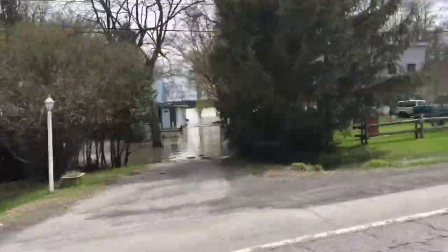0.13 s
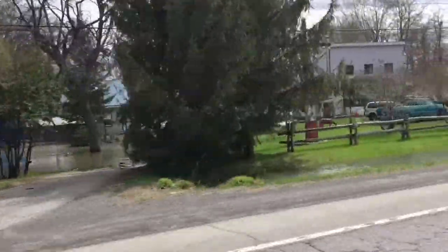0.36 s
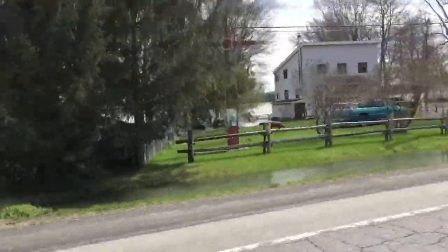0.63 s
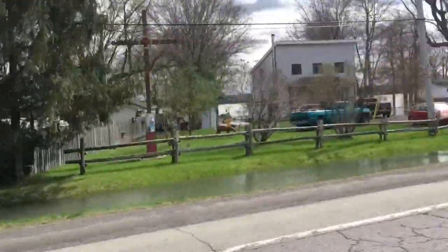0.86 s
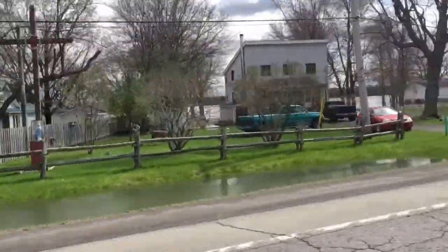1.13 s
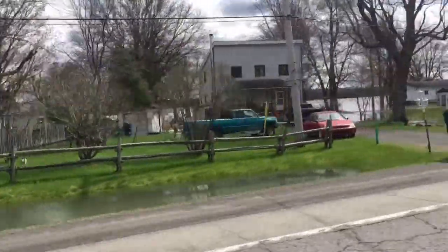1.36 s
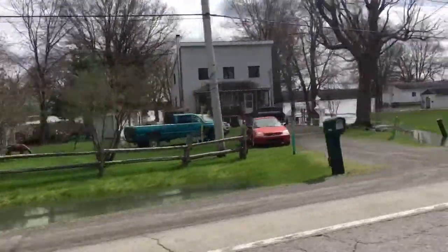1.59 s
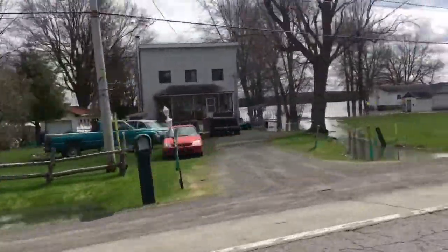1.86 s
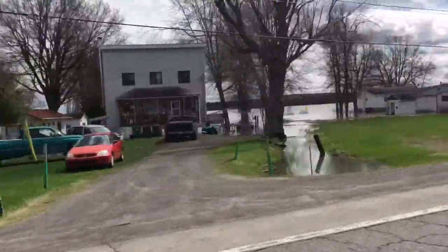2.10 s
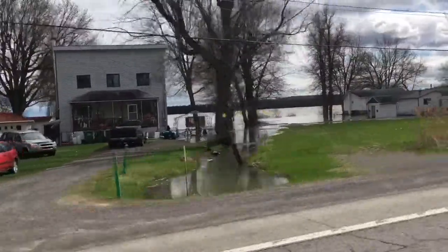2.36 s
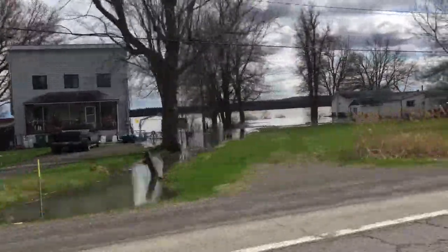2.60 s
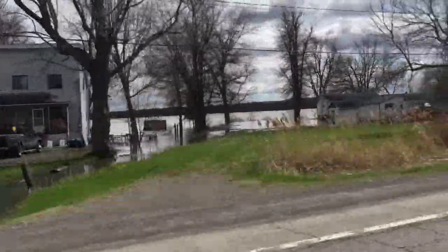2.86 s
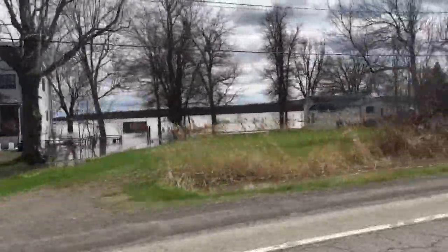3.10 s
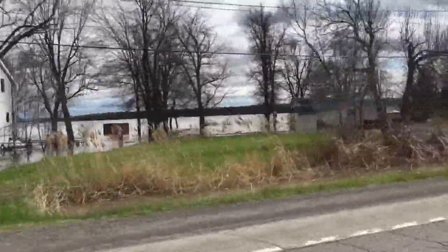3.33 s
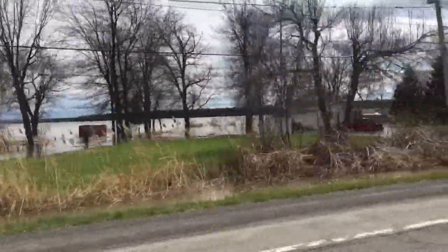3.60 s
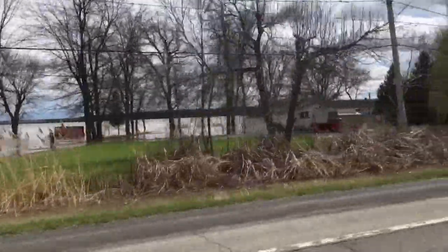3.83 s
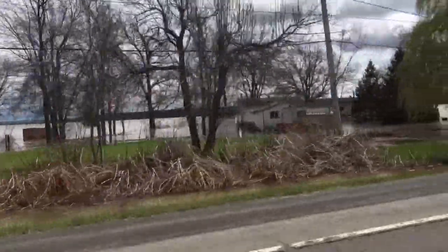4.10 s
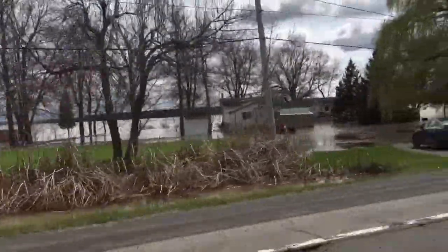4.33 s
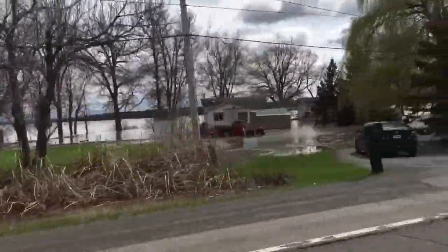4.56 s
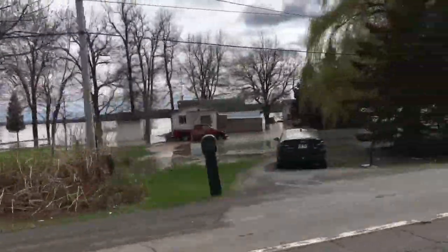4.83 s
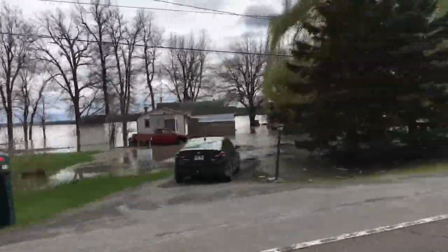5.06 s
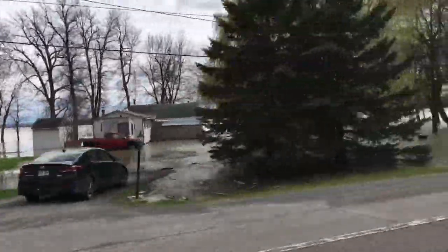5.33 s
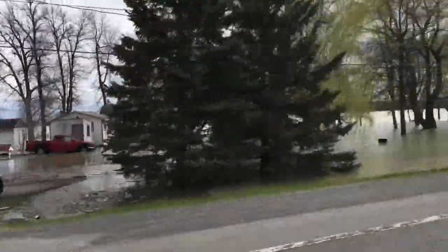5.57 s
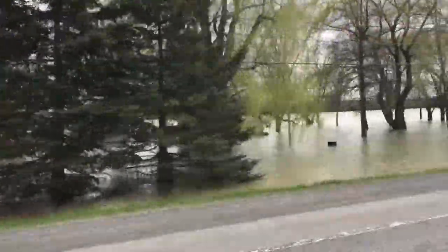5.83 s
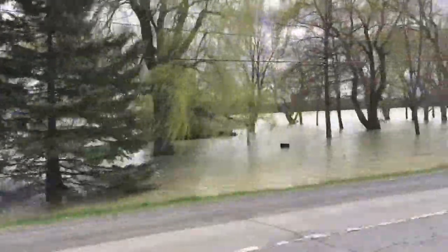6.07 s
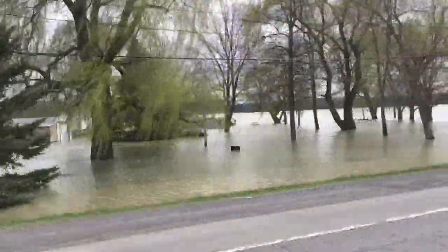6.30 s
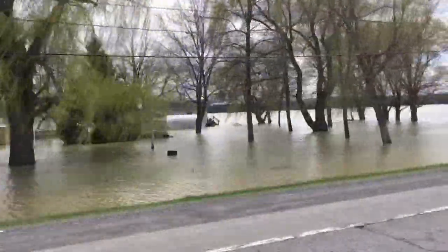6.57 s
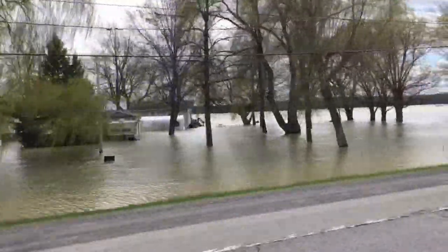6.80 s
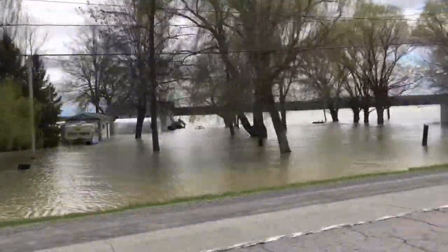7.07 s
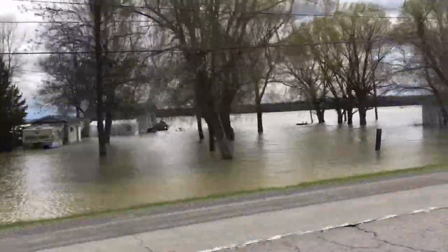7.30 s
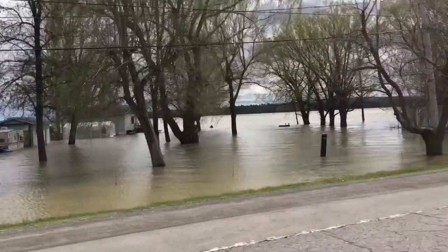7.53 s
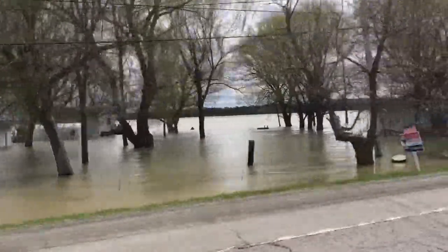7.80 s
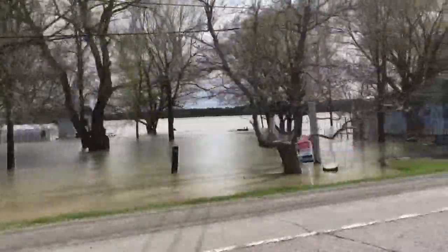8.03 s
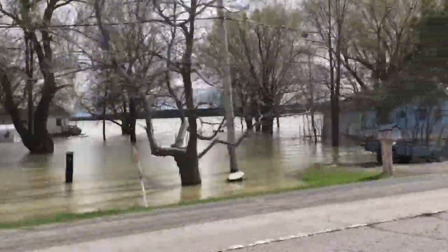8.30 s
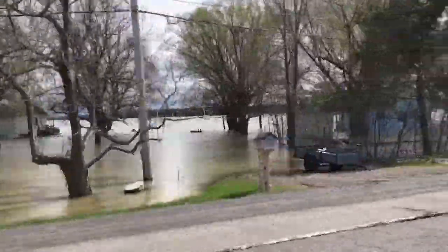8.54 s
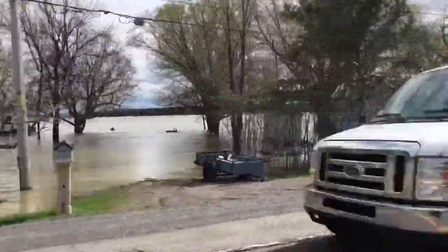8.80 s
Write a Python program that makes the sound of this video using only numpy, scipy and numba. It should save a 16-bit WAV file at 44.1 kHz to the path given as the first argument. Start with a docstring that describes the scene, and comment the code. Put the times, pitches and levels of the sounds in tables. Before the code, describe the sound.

A phone held at a car's open window catches rough wind noise directly on its microphone: dull thumps, tearing flutter and occasional sharp cracks, the loudest squashed by limiting. Underneath run a wobbling low throb, broad tyre roar with a faint tread hum, and thin slipstream hiss. Gusts come in clusters, ease after six seconds, then strike hard again as the road noise rises.

```python
"""In a car on a country road, a phone films from the open window. Tyres roar and slipstream hisses behind (noise
shaped by frequency), the tread hums, and high hiss fizzes faintly. The cabin air throbs low and unevenly: a tone of
wandering pitch with turbulence. Eddies of wind burst on the microphone port: a ragged rip and a slower flutter of
noise, then a thump of swinging air. The hardest add a crack of bright noise, and the loudest bursts are limited."""
import sys
import numpy as np
from scipy import signal
from scipy.fft import rfft, irfft
from scipy.io import wavfile
from scipy.ndimage import uniform_filter1d, minimum_filter1d
from numba import njit

SR = 44100
rng = np.random.default_rng(int(sys.argv[2]) if len(sys.argv) > 2 else 0)


def attenuation_scalar(level_db):
    """Turn a level in dB into a linear amplitude multiplier (20 dB per decade)."""
    decades = np.asarray(level_db, float) / 20
    return 10 ** decades


def log_audio(samples):
    """Write samples as a 16-bit WAV file to the path given in sys.argv[1]."""
    # one column per channel
    frames = np.atleast_2d(samples).T
    # limit to full scale, then quantise
    limited = np.clip(frames, -1, 1)
    pcm = np.round(limited * 32767).astype(np.int16)
    wavfile.write(sys.argv[1], SR, pcm)


N = 392931  # samples in the scene

# The strong eddies on the port; the levels are those before each part's own offset and ceiling.
# Each row: middle in seconds, nominal length in ms, thump level in dB, flutter level in dB, rip level in dB.
EDDIES = [(0.394, 22, -23, -16.5, -17), (0.624, 19, -14, -18.5, -35.5), (0.634, 6.4, -20, -23, -18.5),
          (0.66, 6, -34, -32, -23), (0.762, 7.1, -14, -27, -37), (0.825, 15, -16, -30, -42),
          (0.977, 18, -9, -9.5, -16), (1.198, 6, -6, -16, -24), (1.217, 19.5, -6.5, -17.5, -14.5),
          (1.228, 8, -15, -14, -22), (1.312, 9, -1, -17, -21), (1.344, 12, -17, -32, -30.5),
          (1.38, 8.6, -14.5, -23, -25), (1.426, 10, -13, -17, -16), (1.5, 13.4, 3, -10.5, -10),
          (1.559, 13, -22, -14.5, -27), (1.592, 4.6, -3, -18, -19.5), (1.661, 4.7, -8.5, -38, -20.5),
          (1.764, 8.6, -25, -14.5, -28), (1.787, 29, -15.5, -34, -22.5), (1.832, 11, -13, -9.5, -21.5),
          (1.869, 27, -16, -12.5, -11.5), (2.006, 14, -27, -18, -21.5), (2.054, 17, -19, -12.5, -27),
          (2.091, 10, -12, -8, -12.5), (2.147, 15, -12.5, -26, -27.5), (2.212, 13.5, -27, -16.5, -16),
          (2.234, 11, -9.5, -18, -24.5), (2.375, 37, -12, -17, -26), (2.438, 9.3, -28, -15.5, -26),
          (2.628, 7.4, -39, -18.5, -25), (2.889, 36, -15, -31, -28), (2.98, 17, -15, -33, -23),
          (3.011, 22, -6, -17.5, -24.5), (3.184, 8.6, -28, -21, -27), (3.215, 17, -21, -22, -26),
          (3.262, 11.4, -25, -17, -21), (3.376, 39, -23, -19.5, -29), (3.41, 17, -13, -16, -20),
          (3.463, 10, -22, -15, -20), (3.54, 15, -5, -14, -19.5), (3.597, 8, -13, -16, -20),
          (3.607, 10, -9.5, -14.5, -12), (3.673, 11, -15.5, -24, -29), (3.751, 10, -25, -23, -26),
          (3.83, 13, -29, -23, -27), (3.918, 7.9, -28, -25, -25), (4.015, 38, -8.5, -18, -28),
          (4.044, 8.5, -16, -24, -25), (4.103, 4.4, -32, -27, -30), (4.229, 13, -14, -19.5, -44),
          (4.307, 9.4, -7, -16, -38), (4.331, 14, -16, -25, -24), (4.432, 26, -29, -18.5, -19.5),
          (4.483, 16, -5, -7.5, -21.5), (4.494, 7, -22, -25, -11.5), (4.524, 12, -20, -21, -35),
          (4.56, 12.7, -5.5, -8, -11.5), (4.638, 12.5, -9.5, -11, -17), (4.651, 7.4, -15, -17, -21),
          (4.718, 10.5, -11.5, -22, -22.5), (4.818, 28, -8.5, -16, -18.5), (4.886, 7, -5.5, -5, -12),
          (5.016, 10.7, -26, -12, -21.5), (5.071, 20, -10, -22, -27.5), (5.096, 8, -17, -17, -17),
          (5.106, 10.6, -9.5, -17, -13), (5.167, 11, -11, -18, -19.5), (5.221, 13, -11, -13, -21.5),
          (5.24, 27, -11.5, -15, -17), (5.279, 14.5, -5, -13, -17.5), (5.301, 5.2, -22, -13, -25),
          (5.324, 5.5, -11, -15, -12.5), (5.395, 4.5, -8, -7.5, -16), (5.455, 12, -25, -19, -33),
          (5.525, 8.7, -24, -26, -24), (5.55, 18, -19, -14.5, -17), (5.617, 19.4, -6.5, -16.5, -13),
          (5.59, 14, -30, -21, -26), (5.658, 4.3, -4.5, -18.5, -19.5), (5.724, 12, -17, -23, -35),
          (5.797, 18.6, -5, -6.5, -7.5), (5.82, 4.2, -10, -13, -20), (5.839, 8, -17, -16, -30),
          (5.87, 14, -5.5, -11, -8), (5.894, 22, -9.5, -10, -18), (5.943, 14, -28, -30, -34),
          (5.997, 8.2, -39, -31, -34), (6.038, 42, -30, -19, -22.5), (6.081, 8, -35, -18.5, -15),
          (6.108, 14, -20, -22, -25), (6.151, 10, -20, -27, -17), (6.165, 5.8, -9, -13, -15.5),
          (6.287, 13, -28, -21.5, -37), (6.592, 10, -2, -11, -13.5), (6.676, 22, -17, -17.5, -24),
          (6.701, 7, -32, -23, -30), (6.816, 6.6, -23, -14.5, -27), (6.9, 8.3, -17, -23, -27),
          (7.2, 6.3, -15, -10.5, -33), (7.209, 10, -18, -21, -20.5), (7.234, 10, -24, -24, -26),
          (7.27, 21, -29, -16, -21), (7.486, 7.5, -6.5, -24, -17.5), (7.5, 8.6, -12, -18, -32),
          (7.514, 12, -10, -20, -51), (7.689, 7.8, -27, -17.5, -45), (8.11, 4.7, -16, -13.5, -33),
          (8.179, 16, -13, -23, -45), (8.273, 24, -9, -23.5, -39), (8.306, 10, -11, -11.5, -40),
          (8.601, 15, -23, -19, -20), (8.628, 12, -14.5, -5.5, -9.5), (8.643, 12, -9, -19, -15.5),
          (8.702, 8.3, -34, -22, -20), (8.743, 45, -15, -17, -37), (8.795, 11.4, -8, -6, -6),
          (8.861, 19, -15, -11.5, -16), (8.874, 7.3, -6, -7, -3), (8.888, 13, 2, -6, -20.5)]


def curves(table):
    """Joins the rows of a table by straight lines: one curve over time per column."""
    s, *columns = np.transpose(table)
    return [np.interp(np.arange(N) / SR, s, c) for c in columns]


def walk(rate, size=N):
    """A smooth random wander: draws held for 1 / rate seconds, then averaged twice; spread near 1."""
    hold = max(int(SR / rate), 1)
    steps = np.repeat(rng.standard_normal(size // hold + 1), hold)
    smooth = uniform_filter1d(uniform_filter1d(steps, hold), hold)
    return 1.3 * smooth[:size]


def noise(shape, flicker_db=0, shared_db=0, rate=10):
    """Noise of a given spectrum, rms 1, in octave bands that flicker together and alone."""
    hz = np.maximum(np.arange(N // 2 + 1) * SR / N, 1)
    at, db = np.transpose(shape)
    shape_db = np.interp(np.log(hz), np.log(at), db, left=-120, right=-120)
    full = rfft(rng.standard_normal(N)) * attenuation_scalar(shape_db)
    out, shared = 0, shared_db * walk(rate)
    for octave in np.arange(np.floor(np.log2(at[0])), np.log2(at[-1]) + 1):
        share = np.clip(1 - abs(np.log2(hz) - octave), 0, 1)  # neighbouring bands overlap
        out = out + irfft(full * share, N) * attenuation_scalar(shared + flicker_db * walk(rate))
    return out / np.std(out)


def even(x, ms):
    """Flattens the chance swells of noise, so that a short burst has the strength it is given."""
    return x / np.sqrt(uniform_filter1d(x ** 2, int(ms * SR / 1000)) + 1e-9)


def swing(hz, wander, rate):
    """Air swinging to and fro at a pitch that wanders; rms 1."""
    pitch_hz = hz * np.exp(wander * walk(rate))
    return np.sqrt(2) * np.sin(2 * np.pi * np.cumsum(pitch_hz) / SR)


def puffs(s, db, width_ms, lean=0.17):
    """Bell-shaped envelopes that rise faster than they fall and add in power."""
    power = np.zeros(N)
    for at, gain, width in np.broadcast(s, attenuation_scalar(db), np.asarray(width_ms) * SR / 1000):
        i = np.arange(max(int(at * SR - 4 * width), 0), min(int(at * SR + 4 * width), N))
        age = (i - at * SR) / width + lean
        power[i] += gain ** 2 * np.exp(-(age / (1 + lean * np.sign(age))) ** 2)
    return np.sqrt(power)


def road():
    """Tyre roar up to the low treble, a narrow tread hum and a thin slipstream hiss, all made of noise."""
    # How loud the road is heard; it sinks while hard eddies burst.
    # Each row: time in seconds, tyre roar in dB, slipstream hiss in dB.
    road_levels = [(0.0, -32.5, -55.5), (0.3, -30.5, -55), (0.5, -29, -53), (0.8, -27.5, -50.5),
                   (1.15, -28.5, -52), (1.5, -30, -54), (1.85, -32, -54.5), (2.3, -30.5, -54),
                   (2.8, -27.5, -50.5), (3.3, -28, -51.5), (3.6, -29.5, -54), (3.97, -29.5, -51),
                   (4.4, -30, -55), (4.9, -33, -56), (5.4, -33, -57.5), (5.75, -34.5, -58),
                   (5.98, -39, -57), (6.2, -35.5, -57.5), (6.5, -33, -56.5), (6.8, -30, -52.5),
                   (7.1, -30, -52), (7.55, -31, -52), (7.9, -28.5, -52.5), (8.3, -27, -49.5),
                   (8.65, -24.5, -47.5), (8.91, -24, -45)]
    # The tone of the roar, the hiss and the hum. Each row: frequency in Hz, relative level in dB per Hz.
    tyre_tone = [(90, -31), (150, -6.5), (314, -9), (445, -12.5), (526, -5.5), (745, -11.5), (958, -8.5),
                 (1450, -9.5), (2150, -14), (2450, -20.5), (2700, -28.5), (3000, -31), (3300, -38),
                 (4200, -42.5)]
    slipstream_tone = [(1940, -23.5), (3300, -4), (3840, -6.5), (4520, 0.5), (4890, -3), (5390, 1.5),
                       (6480, 1), (7740, -6.5), (9540, -7), (10500, -13), (14900, -10.5), (15800, -22)]
    hum_tone = [(380, -15), (460, -4.5), (530, 1), (620, -18)]
    # The hum comes forward at the end. Each row: time in seconds, level in dB.
    hum_levels = [(0, -41.5), (1, -47), (5, -48.5), (7.5, -43.5), (8.2, -39), (8.91, -31)]
    tyre_db, hiss_db = curves(road_levels)
    tyres = attenuation_scalar(tyre_db) * noise(tyre_tone, 0.7, 0.7, 22)
    hum = attenuation_scalar(curves(hum_levels)[0]) * noise(hum_tone, 1.3)
    hiss = attenuation_scalar(hiss_db) * noise(slipstream_tone, 0.8, 0.78, 18)
    return tyres + hum + hiss


def fizz(weak_rate=3, weak_db=-66):
    """Faint puffs of high hiss at set times; others come by chance, weak_rate of them a second."""
    # The treble fizzes briefly. Each row: time in seconds, level in dB, centre in Hz.
    fizz_puffs = [(1.235, -56.5, 11900), (3.208, -58, 11000), (3.952, -57, 12000), (5.48, -59.5, 10000),
                  (8.272, -49, 8500)]
    chance = rng.random((int(weak_rate * N / SR), 2)).T
    weak_tone = noise([(8000, -22), (12000, 0), (15800, -13)])
    total = puffs(chance[0] * N / SR, weak_db + 6 * chance[1], 6.4) * weak_tone
    for s, db, hz in fizz_puffs:
        tone = noise([(0.59 * hz, -20), (hz, 0), (min(1.1 * hz, 16000), -9)])
        total = total + puffs(s, db, 7.8) * tone
    return total


def throb():
    """The cabin air swings at a quickly wandering pitch, in surges and lulls; broad turbulence rides on it."""
    # The surges and lulls. Each row: time in seconds, level in dB before wander and breaks.
    throb_levels = [(0.0, -17.5), (0.1, -13.5), (0.3, -18.5), (0.55, -14), (0.6, -16.5), (0.65, -5.5),
                    (0.79, -20.5), (0.97, -8.5), (1.09, -28), (1.14, -9.5), (1.49, -20), (1.51, -13),
                    (2.01, -19), (2.11, -13), (2.21, -20.5), (2.95, -12), (3.23, -18.5), (3.45, -3.5),
                    (3.5, -18), (3.6, -8), (3.65, -21.5), (3.72, -11), (3.9, -19), (4.02, -10.5),
                    (4.27, -20.5), (4.32, -8), (4.37, -20), (4.44, -8), (4.69, -16.5), (4.91, -15),
                    (4.96, -26), (5.09, -12.5), (5.21, -20), (5.24, -13), (5.46, -25.5), (5.53, -14),
                    (5.61, -16), (5.83, -16), (6.03, -23.5), (6.18, -14.5), (6.2, -27.5), (6.4, -24),
                    (6.43, -15.5), (6.6, -13.5), (6.65, -36), (6.68, -22), (6.92, -17.5), (7.1, -10),
                    (7.2, -20), (7.4, -7), (7.45, -23), (7.54, -13.5), (8.14, -18), (8.19, -4.5),
                    (8.24, -20), (8.31, -4), (8.36, -31), (8.56, -10.5), (8.69, -22), (8.91, -13)]
    # The tone of the turbulence. Each row: frequency in Hz, relative level in dB per Hz.
    turbulence_tone = [(20, -20.5), (35, 3), (65, 1.5), (95, -12.5), (140, -23), (250, -45), (500, -40)]
    cabin = swing(54.83, 0.28, 80) * attenuation_scalar(1.8 * walk(30))
    turbulence = attenuation_scalar(-2.0) * even(noise(turbulence_tone, 3.2, 3.7, 22), 44.5)
    # an eddy whose thump passes this level breaks up the throb, which then builds again
    break_from_db, break_depth, break_lag_s, break_ms = -15.5, 0.7, 0.042, 25
    s, thump_db = np.transpose(EDDIES)[[0, 2]]
    coarse = np.arange(0, N, 64)  # every 64th sample is enough for the lulls
    age = (coarse[:, None] / SR - s - break_lag_s) * 1000 / break_ms
    depth_db = break_depth * np.maximum(thump_db - break_from_db, 0)
    lull_db = (depth_db * np.exp(-age ** 2)).max(axis=1)
    level_db = curves(throb_levels)[0] + 1.0 * walk(12) - np.interp(np.arange(N), coarse, lull_db)
    return attenuation_scalar(level_db) * (cabin + turbulence)


def cracks():
    """Bright noise for a millisecond or two at the hardest fronts; very faint clicks by chance around eddies."""
    # Sharp fronts of the hardest eddies. Each row: time in seconds, crack level in dB, treble level in dB.
    fronts = [(0.393, -29, -58), (1.4966, -10.5, -41), (1.8588, -38, -54), (1.866, -22.5, -39),
              (1.869, -15, -43), (1.8729, -14.5, -36.5), (1.875, -11.5, -36), (2.053, -16, -42.5),
              (2.092, -14, -48), (4.5566, -19, -56), (4.8151, -18, -46.5), (4.8842, -12, -45),
              (5.11, -19, -59.5), (5.281, -31, -59), (5.323, -35, -62), (5.622, -31, -53),
              (5.659, -18, -52), (5.791, -15, -46), (5.793, -14, -58), (5.797, -16, -58), (5.807, -35, -52),
              (5.817, -31, -56), (5.3921, -31, -57), (5.863, -17, -46), (5.8662, -9.5, -42),
              (5.871, -9, -34), (5.892, -28, -53), (5.9044, -19, -52.5), (6.032, -26, -51),
              (6.592, -18, -50), (8.646, -24, -58), (8.7955, -16, -57.5), (8.8746, -12, -37)]
    # The tone of the crack and of the sizzle above it. Each row: frequency in Hz, relative level in dB per Hz.
    crack_tone = [(700, -9), (1300, 0), (2000, -9.5), (2800, -20)]
    sizzle_tone = [(2200, -10), (3000, 5), (4400, -5), (5000, -15.5), (7000, -37)]
    at, ms, rip_db = np.transpose(EDDIES)[[0, 1, -1]]
    # very faint clicks scattered by chance around each eddy; level follows the rip, capped
    click_db = np.minimum(-36 + 1.3 * (rip_db + 15.5), -40)
    click_s = at + ms / 1000 * 0.3 * (rng.random(len(at)) - 0.5)
    clicks = [click_s, click_db, click_db - 25]
    s, crack_db, treble_db = np.hstack([np.transpose(fronts), clicks])
    sizzle_db = np.minimum(treble_db + 16.5, -26)
    crack = puffs(s, crack_db, 0.9, lean=0.1) * even(noise(crack_tone), 2.2)
    sizzle = puffs(s, sizzle_db, 1.0, lean=0.1) * even(noise(sizzle_tone), 1.2)
    treble = noise([(4500, -10.5), (6000, 2.0), (10000, -12.0), (15800, -14)])
    return crack + sizzle + puffs(s, treble_db, 0.99, lean=0.1) * treble


def eddies(weak_rate=24, weak_db=-38, count=2):
    """Each eddy rips, then flutters, and the pressure swings back last; weak ones come at random times throughout."""
    # The tone of the rip and the flutter. Each row: frequency in Hz, relative level in dB per Hz.
    rip_tone = [(250, -13), (450, -1), (800, -7), (1300, -19), (2200, -26.5), (3500, -46.5)]
    flutter_tone = [(70, -18.5), (130, 3), (220, 0.5), (380, -8.5), (600, -21)]
    # weak eddies at random times, weak_rate of them a second
    chance = rng.random((int(weak_rate * N / SR), 5)).T
    size_db = weak_db + 12 * chance[1]
    weak_rip_db = size_db - 13.0 + 8 * chance[3]
    weak = [chance[0] * N / SR, 8 + 12 * chance[2], size_db + 4 * chance[4], size_db, weak_rip_db]
    # each strong eddy trails a wake of smaller ones, count of them
    luck = rng.random((len(EDDIES) * count, 4)).T
    at, _, *parent_db = np.repeat(EDDIES, count, axis=0).T
    wake_s = at + 0.0461 * (0.22 + luck[0])
    wake_db = np.array(parent_db) + [[-17], [-17], [-21.5]] + 8 * luck[[2, 2, 3]]
    wake = [wake_s, 6 + 8 * luck[1], *wake_db]
    s, ms, thump_db, flutter_db, rip_db = np.hstack([np.transpose(EDDIES), wake, weak])
    # a ceiling on the level of each part, in dB, before its own offset
    thump_db, flutter_db, rip_db = np.minimum([thump_db, flutter_db, rip_db], -3)
    tearing = even(noise(rip_tone), 8.3)
    rip = puffs(s + 0.00044, rip_db + 0.25, 0.29 * ms) * tearing * attenuation_scalar(1.85 * walk(400))
    # shreds of the eddy crackle on around and after it
    shreds = puffs(s + 0.0026, rip_db - 17.5, 0.67 * ms) * tearing * attenuation_scalar(4.9 * walk(250))
    fluttering = even(noise(flutter_tone), 8.2) * attenuation_scalar(0.99 * walk(200))
    flutter = puffs(s + 0.00095, flutter_db + 0.13, 0.39 * ms) * fluttering
    thump = puffs(s + 0.0057, thump_db - 2.5, 3 + 0.35 * ms) * swing(100, 0.25, 70)
    return rip + shreds + flutter + thump


def scene():
    """Everything adds up at one microphone."""
    return (road() + fizz() + throb() + cracks() + eddies())[None, :]


@njit
def limiter(peak, top, release):
    """Gain that drops at once when the peak would pass the top, and recovers slowly."""
    gain, held = np.empty(len(peak)), 0.
    for i in range(len(peak)):
        held = max(peak[i], held * release)
        gain[i] = min(1., top / (held + 1e-9))
    return gain


def roll_off(x):
    """The treble ends steeply here."""
    return signal.sosfilt(signal.butter(12, 16100, fs=SR, output="sos"), x)


def record(dry):
    """The microphone drops the deepest bass; the phone limits the bursts, looking about a millisecond ahead."""
    dry = signal.sosfilt(signal.butter(3, 30, "high", fs=SR, output="sos"), dry)
    ahead = int(0.0011 * SR)
    peak = -minimum_filter1d(-abs(dry[0]), 2 * ahead + 1)  # the largest value nearby
    release = np.exp(-1 / (0.02 * SR))  # recovers over about 20 ms
    gain = uniform_filter1d(limiter(peak, 1.0, release), ahead)
    return roll_off(dry * gain)


dry = scene()
out = record(dry)
log_audio(out)
```